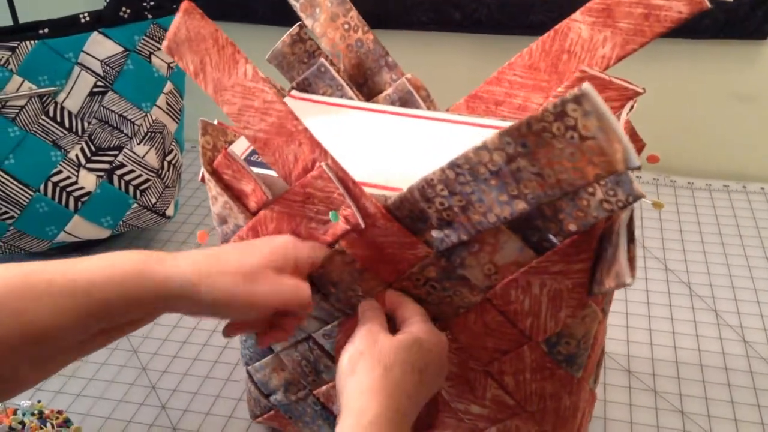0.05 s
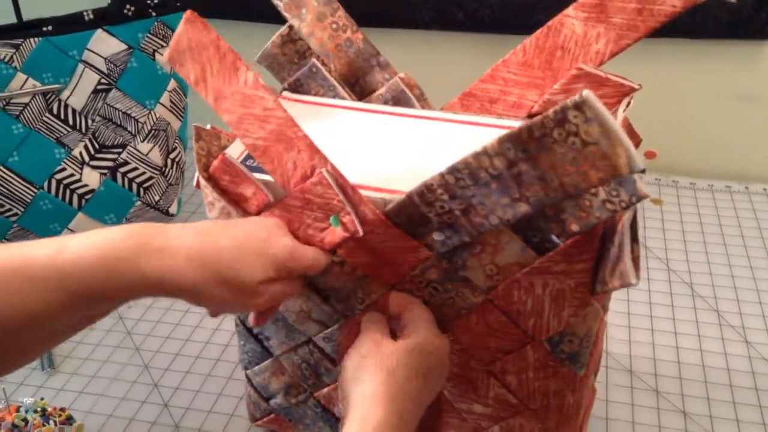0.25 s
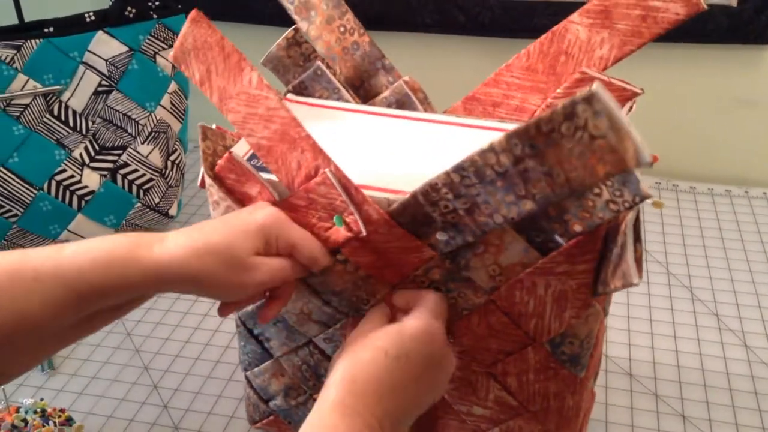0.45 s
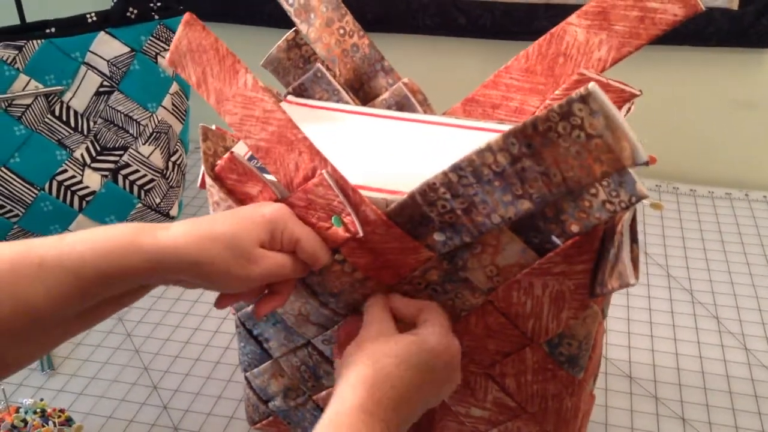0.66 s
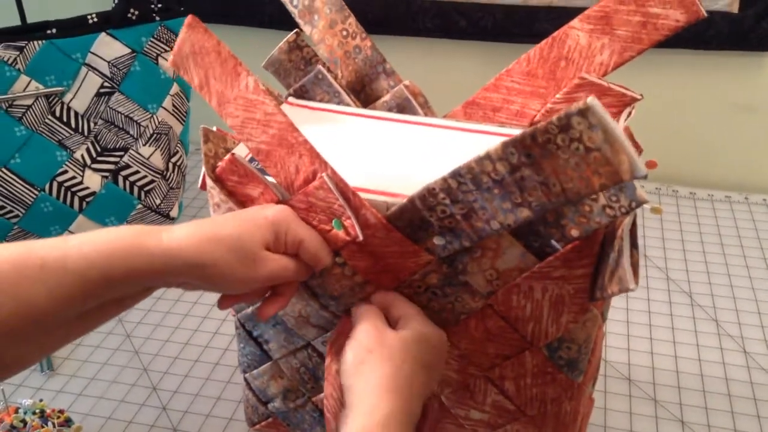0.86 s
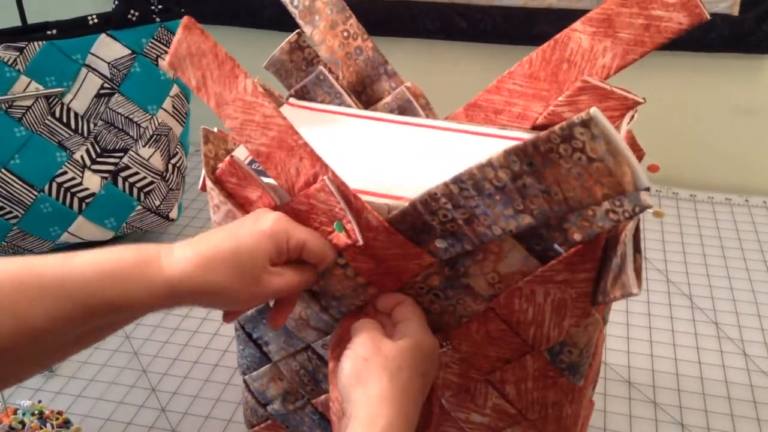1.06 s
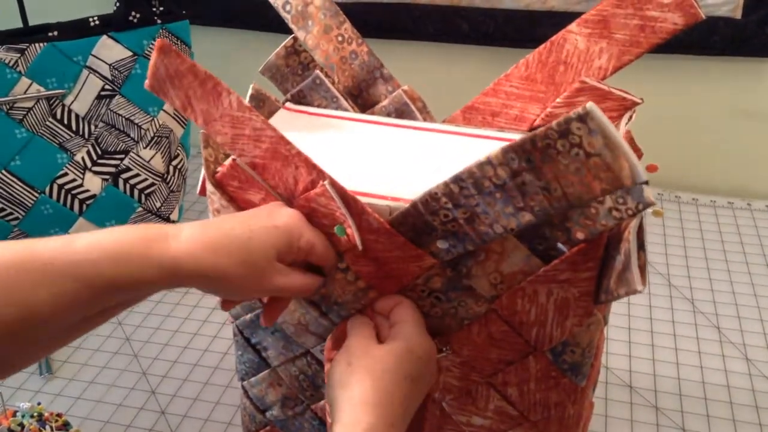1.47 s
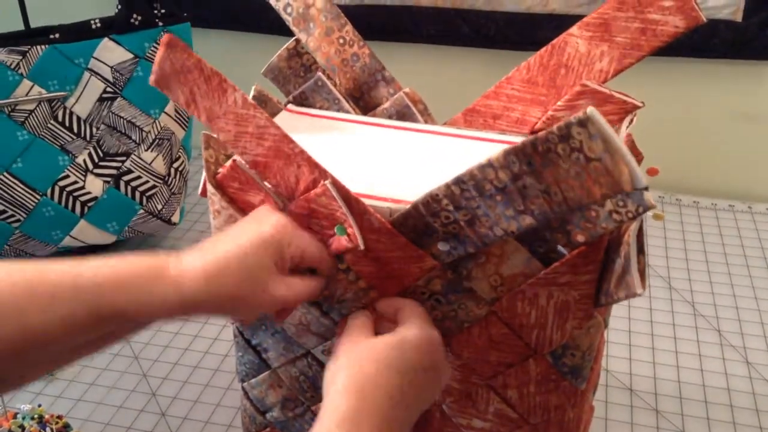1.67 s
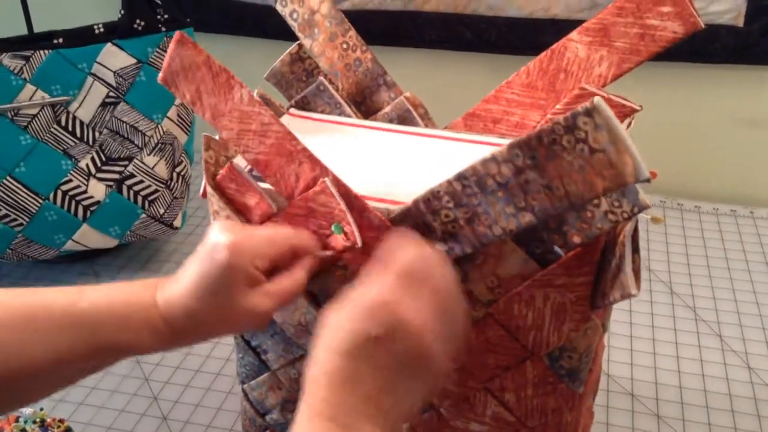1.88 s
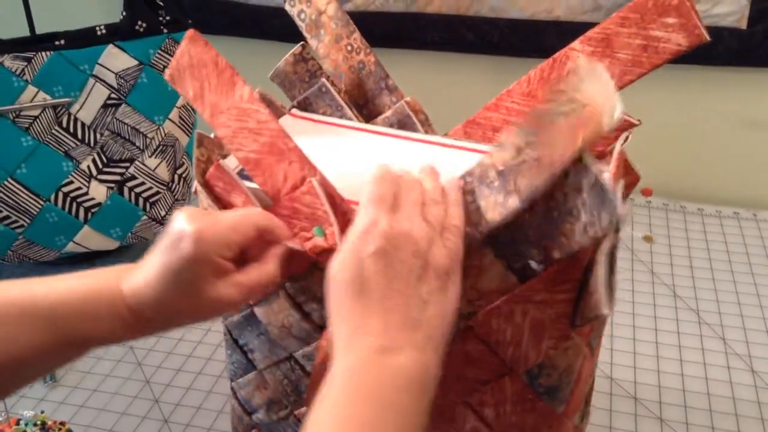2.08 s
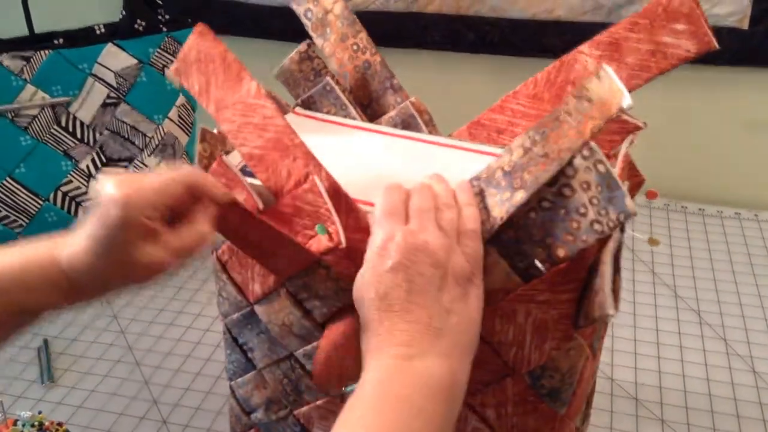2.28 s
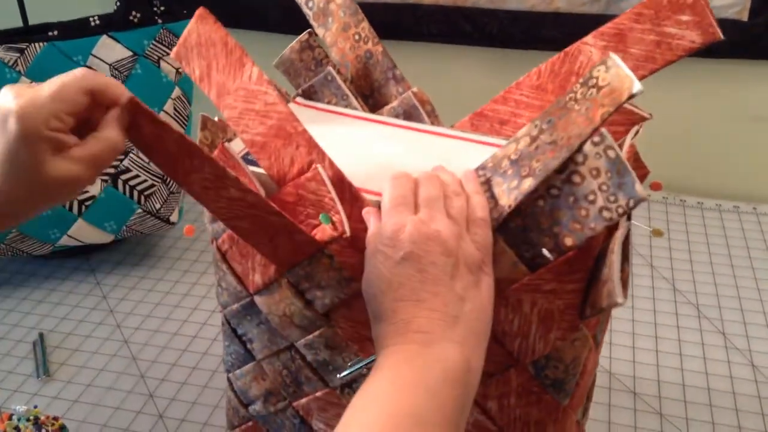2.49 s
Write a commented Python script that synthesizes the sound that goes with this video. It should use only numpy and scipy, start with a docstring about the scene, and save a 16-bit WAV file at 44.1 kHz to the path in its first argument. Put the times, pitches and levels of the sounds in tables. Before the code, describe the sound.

A fabric strip is tugged and snaps taut in a loud, quick stutter at about 0.2 seconds. Fingers then scuff and rustle faintly on the stiff woven cloth. At 1.2 seconds something small and hard knocks once on the table. From about 1.7 seconds a strip slides through the weave with a soft hiss, snapping again near 2.35 and lightly at 2.55. It is close, in a quiet room.

```python
"""A tugged fabric strip stutters free and snaps taut: hands weave a basket, close by in a quiet room.
Fingers scuff the stiff cloth in runs of tiny slips, and something small and hard knocks once,
ringing the table. Last, a strip slides out through the weave with a soft hiss and a final snap."""
import sys
import numpy as np
from scipy import signal
from scipy.fft import rfft, irfft, next_fast_len
from scipy.io import wavfile
from scipy.ndimage import map_coordinates

SR = 44100
rng = np.random.default_rng(int(sys.argv[2]) if len(sys.argv) > 2 else 0)


def wrap_up_sound(samples):
    """Save the sound to the file named by the first command line argument, as 16-bit audio."""
    columns = np.atleast_2d(samples).T
    # keep every value between -1 and 1, then stretch to whole-number steps
    tamed = np.clip(columns, -1, 1)
    steps = np.round(tamed * 32767).astype(np.int16)
    wavfile.write(sys.argv[1], SR, steps)


N = 116865


# Snaps and bumps: (time [s], level [dB], pulse width [ms], flap pitch [Hz])
SNAPS = [(.2063, -27, .6, 240), (.2138, -21, .3, 300), (.2229, -10, 0.28, 240), (.2272, 0.5, 0.2, 230),
         (0.2296, 2, 0.24, 264), (.2312, -1, 0.088, 260), (0.2338, 0.5, 0.55, 247), (.2361, 8, .22, 298),
         (.2374, 7, .035, 400), (.239, -3, 0.76, 152.2), (.2481, -11, 0.13, 219.2),
         (0.2661, -12, 0.27, 190), (0.5891, -34.5, 0.36, 400), (0.7743, -29, 0.42, 450),
         (1.0015, -36, 0.35, 450), (1.1207, -27.5, .25, 251), (1.1296, -30.5, .7, 140.3),
         (1.529, -33, .6, 420), (1.8029, -33, 0.91, 169), (1.875, -37, .8, 262), (1.9635, -31.5, 0.15, 298),
         (2.273, -35, 0.31, 260), (2.3287, -18, 0.15, 257), (2.353, -21, 0.39, 240),
         (2.3567, -0.5, 0.15, 194), (2.4405, -32, .3, 400), (2.5474, -14, .7, 340)]

def snaps():
    """Single jerks of a strip pulled taut, and soft bumps of the fingers on it."""
    out, lead = np.zeros(N + SR), SR // 100
    impulse = signal.unit_impulse(SR // 8, lead)
    for at_s, db, width_ms, flap_hz in SNAPS:
        start = round(at_s * SR) - lead
        out[start:start + len(impulse)] += amp(db) * cloth(impulse, width_ms, flap_hz)
    return out[:N]


def cloth(impulses, width_ms, flap_hz, low_cut_hz=130):
    """Each impulse becomes a sharp pressure cusp and a heavily damped flap of the strip."""
    width_s = width_ms / 1000
    def response(f):
        cusp = 2 * width_s * SR / (1 + (2 * np.pi * f * width_s) ** 2)
        return cusp * high_pass(f, flap_hz, q=.85) * high_pass(f, low_cut_hz, q=.94)
    return filtered(-impulses, response)


# Slip runs: (peak time [s], level [dB], rise [s], fall [s], slip width [ms], flap pitch [Hz],
# fizz re slips [dB])
SCUFFS = [(0.119, -57.5, 0.0071, .012, 0.43, 220, -24), (.235, -21, .011, .007, .4, 160, -14),
          (0.267, -38.5, 0.018, 0.012, .45, 160, -2.5), (.724, -50.5, 0.0025, 0.013, 0.6, 200, -9.5),
          (0.787, -46, 0.012, 0.012, 0.22, 350, -5.5), (.812, -47.5, .008, 0.015, 0.71, 280, -20),
          (1.017, -42.5, 0.01, 0.0074, 0.18, 337, -11.5), (1.12, -37.5, 0.0067, 0.0072, 0.23, 298, -8),
          (1.465, -54.5, .005, .01, .5, 300, -20), (1.754, -51, 0.0045, 0.0075, 1, 298, -24),
          (1.97, -48.5, 0.0097, 0.021, 0.57, 230, -24), (2.215, -44, .006, .011, .7, 220, -16),
          (2.339, -41, 0.01, .03, 0.43, 220, -20)]
# Fibre fizz: (frequency [Hz], relative level [dB])
FIZZ_SPECTRUM = [(200, -29), (800, -8), (2500, 1.5), (5000, -6.5), (10000, -3), (16000, -13)]

def scuffs(slips_per_s=750, spread_db=3):
    """Cloth sticks and slips at an uneven rate, swelling and dying, with fibre fizz on top."""
    out, t = np.zeros(N), clock()
    fizz = noise(FIZZ_SPECTRUM, grain_db=8.5)
    for peak_s, db, rise_s, fall_s, width_ms, flap_hz, fizz_db in SCUFFS:
        gap_jitter, level_jitter = rng.standard_normal((4000, 2)).T
        onsets = (np.cumsum(np.exp(.45 * gap_jitter)) * SR / slips_per_s).astype(int)
        slips = np.bincount(onsets, amp(spread_db * level_jitter), N)[:N]
        before, after = (peak_s - t) / rise_s, (t - peak_s) / fall_s
        swell = np.exp(-np.maximum(before, after)) * np.clip(4 * (3 - before), 0, 1)
        out += amp(db) * swell * (unit(cloth(slips, width_ms, flap_hz)) + amp(fizz_db) * fizz)
    return out


# Thread cracks: (time [s], level [dB], decay [s])
CRACKS = [(0.2296, -27.5, 0.0072), (0.2375, -15, 0.0023), (0.2393, -18, 0.0017), (.7222, -44, 0.0011)]
# Crack noise: (frequency [Hz], relative level [dB])
CRACK_SPECTRUM = [(300, -15.5), (1500, -15.5), (3000, 4.5), (4500, 3), (7000, 0.5), (11000, -6.5),
                  (16000, -14)]

def cracks():
    """Threads crack in short, bright, grainy bursts."""
    envelope = sum(amp(db) * burst(at_s, decay_s) for at_s, db, decay_s in CRACKS)
    return envelope * noise(CRACK_SPECTRUM, grain_db=7)


def tick(level_db=-31, low_cut_hz=10000):
    """One thin tick of treble noise."""
    treble = filtered(rng.standard_normal(N), lambda f: high_pass(f, low_cut_hz, q=.98) ** 2)
    return amp(level_db) * unit(treble) * burst(at_s=.7525, decay_s=.0007)


# Table modes: (frequency [Hz], relative level [dB], t60 [s])
KNOCK_MODES = [(231, -3, .06), (346, 2, 0.044), (424, -4, 0.044), (516, -4, 0.051), (691, -4.5, 0.057),
               (883, -12, 0.048), (1100, -18, .012), (2035, -9, 0.025)]
# Hard contact: (frequency [Hz], relative level [dB])
CONTACT_SPECTRUM = [(500, -21), (1400, -7.5), (2600, -2), (3500, -1), (4300, -4), (5200, -25),
                    (7000, -12.5), (10500, -13), (12500, -5), (14500, -3), (16000, -17)]

def knock(at_s=1.2195, ring_db=-21, blow_db=2, chatter_db=-26, low_cut_hz=189):
    """A small hard thing clicks against the table, chatters and rings it briefly."""
    t = np.maximum(clock() - at_s, 0)
    ring = -sum(amp(db - 60 * t / t60_s) * np.sin(2 * np.pi * hz * t) for hz, db, t60_s in KNOCK_MODES)
    blow = -np.pad(click(CONTACT_SPECTRUM), (round(at_s * SR), N))[:N]
    chatter = noise(CONTACT_SPECTRUM) * burst(at_s, decay_s=.003)
    hit = amp(ring_db) * ring + amp(blow_db) * blow + amp(chatter_db) * chatter
    return filtered(hit, lambda f: high_pass(f, low_cut_hz, q=.91) ** 2)


# Cloth slides: (start [s], end [s], hiss [dB], rub [dB], flex [dB])
STROKES = [(0.235, 0.315, -55, -58.5, -68), (0.337, .40, -57.5, -60, -70),
           (0.408, 0.439, -50.5, -55, -54.5), (0.46, 0.524, -48.5, -58.5, -58),
           (0.546, .57, -55, -65.5, -75), (0.655, 0.682, -53, -65, -65.5), (0.722, 0.733, -56.5, -65, -60),
           (.785, .82, -54.5, -61.5, -57), (0.828, 0.862, -50, -56.5, -53.5),
           (.885, 0.917, -55.5, -61, -66), (1.014, 1.065, -61, -61.5, -62.5),
           (1.155, 1.22, -53.5, -60, -70.5), (1.271, 1.394, -64, -63, -61.5),
           (1.457, 1.472, -68.5, -64.5, -66), (1.624, 1.632, -56, -60.5, -61.5),
           (1.739, 1.822, -56.5, -64, -68), (1.848, 1.976, -60.5, -56.5, -60),
           (2.048, 2.12, -73, -61.5, -62), (2.16, 2.19, -65, -58, -60), (2.204, 2.373, -54.5, -51.5, -58.5),
           (2.386, 2.46, -49, -51.5, -55.5), (2.479, 2.544, -47, -50.5, -55.5),
           (2.613, 2.648, -61.5, -70, -68)]
# Light hand contact between strokes: (time [s], hiss [dB], rub [dB], flex [dB])
GRIP = [(.17, -86.5, -80, -70), (0.219, -64.5, -64.5, -63.5), (1, -61, -66.5, -70.5), (1.55, -59, -67, -67),
        (2.05, -68.5, -61, -65), (2.65, -73, -67.5, -62)]

def stroke_envelopes(rise_s=.02, fall_s=.022):
    """Hiss, rub and flex gains: strokes add in power to the light grip of the hands."""
    t = clock()
    grip_s, *grip_db = np.transpose(GRIP)
    power = amp([np.interp(t, grip_s, db) for db in grip_db]) ** 2
    for start_s, end_s, *levels_db in STROKES:
        outside = np.maximum((start_s - t) / rise_s, (t - end_s) / fall_s).clip(0)
        power += np.outer(amp(levels_db), np.exp(-outside)) ** 2
    return np.sqrt(power)


# Finger hiss, strip hiss, cloth rub, basket flex: (frequency [Hz], relative level [dB])
FINGER_SPECTRUM = [(2000, -22.5), (5000, -14), (8000, -3.5), (11000, 0.5), (14500, 2.5), (16000, -6.5)]
STRIP_SPECTRUM = [(2000, -34), (5000, -14.5), (7500, -2), (9500, 0), (12000, -2.5), (13200, -11),
                  (15000, -12), (16000, -10.5)]
RUB_SPECTRUM = [(100, -26), (300, -4.5), (700, -0.5), (1100, -1.5), (1700, -1), (2800, -4.5), (5000, -12.5),
                (9000, -14), (16000, -38.5)]
FLEX_SPECTRUM = [(30, -40), (80, -28), (130, -11), (200, 0), (290, 0), (450, -14.5), (1000, -23),
                 (4000, -50.5)]

def rustle(slide_s=1.66, crossfade_s=.08):
    """Picking fingers, then a sliding strip, hiss over a grainy rub and the flexing basket's rumble."""
    hiss_gain, rub_gain, flex_gain = stroke_envelopes()
    sliding = np.clip((clock() - slide_s) / crossfade_s + .5, 0, 1)
    fingers = np.sqrt(1 - sliding) * noise(FINGER_SPECTRUM, grain_db=4.5)
    strip = np.sqrt(sliding) * noise(STRIP_SPECTRUM, grain_db=4)
    hiss = hiss_gain * (fingers + strip)
    rub = rub_gain * noise(RUB_SPECTRUM, grain_db=4) * flicker(depth_db=1.4, knots_per_s=160)
    flex = flex_gain * noise(FLEX_SPECTRUM) * flicker(depth_db=1.5, knots_per_s=45)
    return (hiss + rub + flex) * flicker(depth_db=.6, knots_per_s=50)


# Room decay: (frequency [Hz], t60 [s])
ROOM_T60 = [(150, 0.28), (1000, .35), (4000, 0.13), (12000, .18)]

def room(x):
    """Reverberation of a small furnished room; the treble dies first."""
    hz, t, spectra = signal.stft(rng.standard_normal(SR // 2), SR, nperseg=256)
    decay = amp(-60 * t / along(ROOM_T60, hz)[:, None])
    tail = signal.istft(spectra * decay, SR, nperseg=256)[1]
    delayed_tail = np.pad(tail / np.linalg.norm(tail), (SR // 250, 0))
    return signal.fftconvolve(x, delayed_tail)[:N]


# Noise floor: (frequency [Hz], relative level [dB])
FLOOR_SPECTRUM = [(30, -25), (80, -21), (130, -8), (220, 0), (330, -6), (500, -12), (900, -19), (2000, -23),
                  (5000, -24), (15000, -24)]

def noise_floor(level_db=-67):
    """Faint, steady, low-pitched noise."""
    return amp(level_db) * noise(FLOOR_SPECTRUM)


def amp(db):
    """Decibels to gain."""
    return 10 ** (np.asarray(db) / 20)


def unit(x):
    """x at rms 1."""
    return x / np.sqrt(np.mean(x ** 2) + 1e-20)


def along(points, hz):
    """Interpolate (frequency [Hz], value) points on a log axis."""
    knots_hz, values = np.transpose(points)
    return np.interp(np.log(hz + 1), np.log(knots_hz + 1), values)


def clock():
    """Sample times [s]."""
    return np.arange(N) / SR


def burst(at_s, decay_s):
    """Sudden start, exponential fall."""
    t = clock() - at_s
    return (t >= 0) * np.exp(-np.abs(t) / decay_s)


def flicker(depth_db, knots_per_s):
    """Smooth random gain."""
    knots = rng.standard_normal(int(N * knots_per_s / SR) + 4)
    return amp(depth_db * map_coordinates(knots, [clock() * knots_per_s]))


def filtered(x, response):
    """x through a complex frequency response."""
    size = next_fast_len(len(x) + 8192)
    return irfft(rfft(x, size) * response(np.fft.rfftfreq(size, 1 / SR)), size)[:len(x)]


def high_pass(f, corner_hz, q):
    """Causal second-order high-pass response."""
    s = 1j * f / corner_hz
    return s * s / (s * s + s / q + 1)


def noise(spectrum, grain_db=0):
    """Coloured noise of rms 1; grain_db makes single fibres stand out."""
    white = rng.standard_normal(N) * amp(grain_db * rng.standard_normal(N))
    return unit(filtered(white, lambda f: amp(along(spectrum, f))))


def click(spectrum, size=2048):
    """Minimum-phase click with the given spectrum."""
    magnitude = amp(along(spectrum, np.fft.rfftfreq(size, 1 / SR)))
    cepstrum = irfft(np.log(magnitude))
    cepstrum[1:size // 2] *= 2
    cepstrum[size // 2:] = 0
    return irfft(np.exp(rfft(cepstrum)))


def scene(fabric_send_db=-35.5, knock_send_db=-15):
    """Fabric and knock with their reverberation, plus dry rustle and the noise floor; mono."""
    fabric = snaps() + scuffs() + cracks() + tick()
    hit = knock()
    reverb = room(amp(fabric_send_db) * fabric + amp(knock_send_db) * hit)
    return (fabric + hit + reverb + rustle() + noise_floor())[None]


def record(dry, ceiling=.84, top_hz=15600):
    """Soft clip of the loudest snaps, then a brick-wall low-pass."""
    clipped = dry[0] / (1 + np.abs(dry[0] / ceiling) ** 8) ** (1 / 8)
    return filtered(clipped, lambda f: f < top_hz)[None]


dry = scene()
out = record(dry)
wrap_up_sound(out)
```